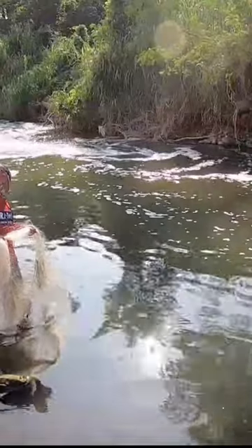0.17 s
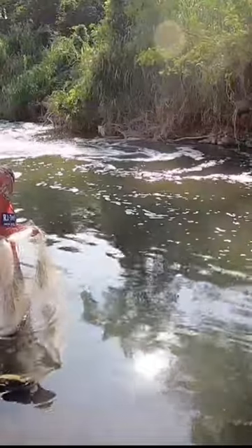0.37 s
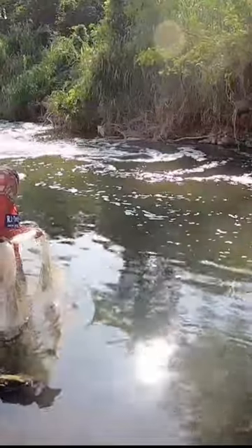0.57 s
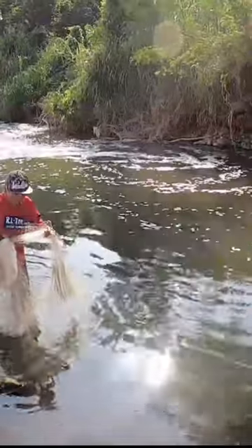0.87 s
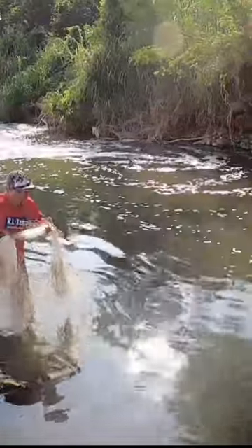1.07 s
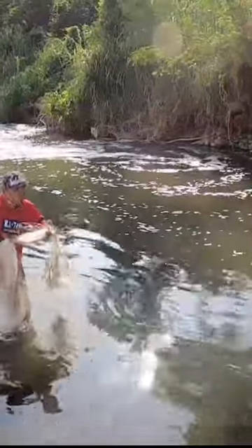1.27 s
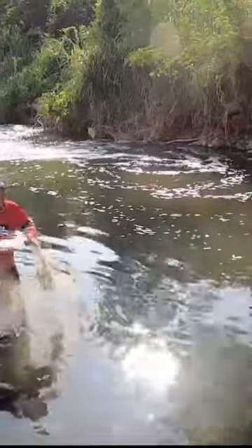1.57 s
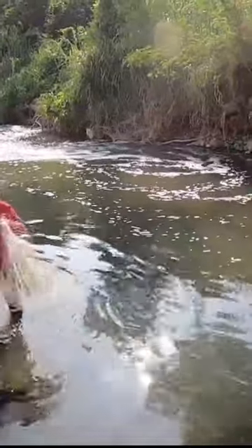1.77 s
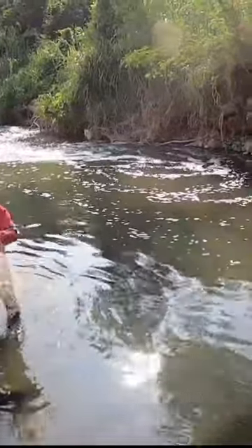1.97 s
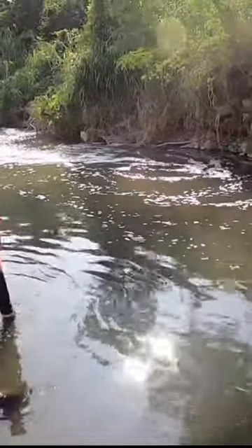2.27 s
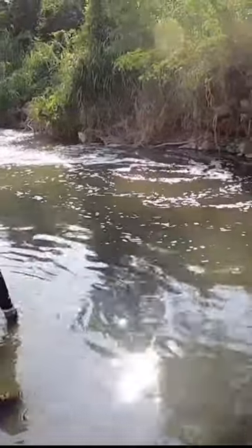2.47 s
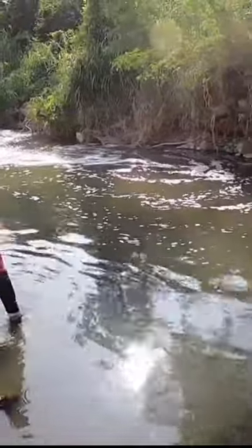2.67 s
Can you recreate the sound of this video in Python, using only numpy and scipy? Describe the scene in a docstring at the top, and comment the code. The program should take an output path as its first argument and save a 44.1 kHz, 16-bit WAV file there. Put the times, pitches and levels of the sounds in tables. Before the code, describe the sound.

A shallow river rushes steadily while a wet cast net drips and a small bird chirps

```python
"""A river riffle with an engine and a bird

A river rushes steadily over a riffle, with a low rumble underneath: shaped noise and many tiny bubble tones. A
distant engine drones and eases off: a few sine waves at multiples of its firing rate. A small bird gives short
falling chirps: brief sliding tones with a soft echo from the bank. A wading leg sloshes once, and water drips
and sloshes around a wet cast net: ringing bubbles and little splats. The sound fades in."""
import sys
import numpy as np
from scipy import signal
from scipy.fft import rfft, irfft, next_fast_len
from scipy.io import wavfile
from scipy.ndimage import map_coordinates

SR = 44100
rng = np.random.default_rng(int(sys.argv[2]) if len(sys.argv) > 2 else 0)


def wrap_up_sound(samples):
    """Save the sound to the file named by the first command line argument, as 16-bit audio."""
    columns = np.atleast_2d(samples).T
    # keep every value between -1 and 1, then stretch to whole-number steps
    tamed = np.clip(columns, -1, 1)
    steps = np.round(tamed * 32767).astype(np.int16)
    wavfile.write(sys.argv[1], SR, steps)


N = 124803  # length in samples

DECAY_60_DB = np.log(1000)  # exp(-DECAY_60_DB) is a fall of 60 dB


def amp(db):
    """Turn decibels into a gain."""
    return 10 ** (np.asarray(db) / 20)


def unit(x):
    """Scale a signal to an rms of 1."""
    return x / np.sqrt(np.mean(x ** 2) + 1e-20)


def along(points, hz):
    """Read a curve of (frequency, value) points, with frequency on a log axis."""
    point_hz, value = np.transpose(points)
    return np.interp(np.log(hz + 1), np.log(point_hz + 1), value)


def curves(rows):
    """Draw straight lines between timed rows: one value per sample for each column after the time."""
    time_s, *columns = np.transpose(rows)
    return [np.interp(np.arange(N) / SR, time_s, column) for column in columns]


def wobble(rate):
    """A smooth random curve through `rate` random points a second."""
    points = rng.standard_normal(1024)
    return map_coordinates(points, [np.arange(N) * rate / SR], mode="mirror")


def filtered(x, response):
    """Filter a sound by multiplying its spectrum by a response to frequency."""
    size = next_fast_len(N + SR // 2)  # spare room for the filter's tail
    hz = np.fft.rfftfreq(size, 1 / SR)
    return irfft(rfft(x, size) * response(hz), size)[..., :N]


def spread(pair, spectrum):
    """Colour two unrelated signals and mix them to stereo: bass central, treble wide, middle at rms 1."""
    # how alike left and right are: frequency_hz, likeness (1 = the same)
    likeness = [(30, .92), (120, 0.98), (500, 0.98), (1100, 0.94), (2000, 0.97), (2700, 0.86), (4000, 0.8),
                (6000, 0.63), (9000, 0.23), (14000, 0.48)]

    def middle_and_side(hz):
        angle = np.arccos(np.clip(along(likeness, hz), -1, .999)) / 2
        return amp(along(spectrum, hz)) * [np.cos(angle), np.sin(angle)]

    mid, side = filtered(pair, middle_and_side)
    return np.array([mid + side, mid - side]) / np.std(mid)


def add(track, s, sound):
    """Mix a sound into a track, starting at s seconds."""
    part = track[round(s * SR):][:len(sound)]
    part += sound[:len(part)]


def bubbles(per_s, cycles, count=9000, size=400):
    """A cloud of tiny fading, rising tones of random pitch and size; each drops 60 dB in `cycles` cycles."""
    rise, spread_db = 0.14, 3
    draws = rng.random((count, 3))[:int(per_s * N / SR)]
    when, pitch, strength = draws.T[:, :, None]
    hz = 500 + 12000 * pitch ** 2  # low pitches are the most common
    t = np.arange(size) / SR
    age = t * hz / cycles
    gain = amp(-spread_db * np.log(np.maximum(strength, .004))) * hz ** .75
    phase = 2 * np.pi * hz * t * (1 + rise * np.minimum(age, 1))
    tones = gain * np.exp(-DECAY_60_DB * age) * np.sin(phase)
    places = (when * N).astype(int) + np.arange(size)
    return np.bincount(places.ravel(), tones.ravel(), N)[:N]


def river():
    """Rushing noise, fine fizz and sparser, longer-ringing bubbles all swell slightly with the flow."""
    # colour of the water noise: frequency_hz, relative level_db per Hz
    water_colour = [(120, -10.5), (200, -8), (350, -10), (430, -8), (490, -6), (710, -8), (818, -14.5),
                    (929, -6.5), (1070, -4.5), (1260, -7), (1380, -13), (1540, -9), (1800, -14),
                    (2300, -15), (2650, -19.5), (2840, -16), (3020, -20), (4010, -22.5), (4700, -26),
                    (6300, -29.5), (6600, -33), (7600, -32), (8100, -35.5), (9800, -38), (11000, -43),
                    (12600, -42.5), (13200, -52), (15000, -59)]
    # slow swell of the river: time_s, swell_db
    swell_points = [(.3, 1.5), (.6, -0.77), (.92, 1.05), (1.02, 0), (1.35, -0.15), (1.6, 0), (2.05, -0.2),
                    (2.25, 0.1), (2.5, -0.5), (2.83, -0.3)]
    rush_db, fizz_db, gurgle_db = -39.5, -48.5, -51.5
    surge_db, flutter_db = 0.7, 0.5  # slow and fast random level changes

    rush = spread(rng.standard_normal((2, N)), water_colour)
    swell_db, = curves(swell_points)
    flow = amp(swell_db + surge_db * wobble(4.32) + flutter_db * wobble(28.1))
    fizz_pair = np.array([bubbles(per_s=1500, cycles=13) for _ in range(2)])
    fizz = spread(fizz_pair, water_colour)
    gurgle_pair = np.array([bubbles(per_s=380, cycles=22.6, size=1600) for _ in range(2)])
    gurgle = spread(gurgle_pair, water_colour)
    return flow * (amp(rush_db) * rush + amp(fizz_db) * fizz + amp(gurgle_db) * gurgle)


def rumble():
    """Low noise under the water, with an uneven level."""
    # colour of the rumble: frequency_hz, relative level_db per Hz
    low_colour = [(10, -25), (24, -2.5), (42, -1), (68, -2), (84, -9), (115, -10), (150, -11.5), (210, -15),
                  (260, -22.5), (400, -36), (900, -66)]
    # loudness of the rumble over time: time_s, level_db
    level_points = [(.2, -33.5), (.3, -42), (.4, -33), (.46, -40), (.62, -37.5), (.76, -33), (.84, -36),
                    (.95, -34.5), (1.04, -41), (1.12, -35), (1.28, -36.5), (1.42, -32), (1.54, -36),
                    (1.65, -32.5), (1.94, -35), (2.03, -31.5), (2.13, -36), (2.36, -37), (2.43, -33),
                    (2.55, -38), (2.65, -33.5), (2.72, -35)]
    level_db, = curves(level_points)
    return amp(level_db) * spread(rng.standard_normal((2, N)), low_colour)


def engine(jitter=0.0082, waver_db=1.84):
    """Only the lowest multiples of the firing rate carry this far; each wavers on its way."""
    # the engine over time: time_s, firing_rate_hz, level_db, brightness_db per multiple
    running = [(.17, 57.63, -38.5, 0.5), (.45, 56.64, -35, -2), (.65, 57, -37, 1), (.93, 55.15, -36, -0.5),
               (1.03, 50.1, -38.5, -1), (1.25, 49.58, -38, -1.5), (1.6, 48.68, -42, 1.5),
               (2.05, 47.84, -40.5, 2.2), (2.35, 48.84, -42.5, 2), (2.83, 48.2, -43.5, -4.5)]
    # strength of each tone: multiple of the firing rate, relative level_db
    multiples = [(1, -2.5), (2, -1), (3, -6), (4, -11.5)]

    hz, level_db, brightness_db = curves(running)
    phase = 2 * np.pi * np.cumsum(hz * (1 + jitter * wobble(14))) / SR
    drone = np.zeros(N)
    for multiple, db in multiples:
        tone_db = db + brightness_db * (multiple - 2) + waver_db * wobble(7.98)
        start_phase = 2 * np.pi * rng.random()
        drone += amp(tone_db) * np.sin(round(multiple) * phase + start_phase)
    return np.sqrt(2) * amp(level_db) * drone


def ring(hz, cycles):
    """One bubble: a fading, rising tone; the larger, lower ones last longer."""
    attack_s, rise = 0.00066, 0.065
    t = np.arange(SR // 10) / SR
    age = t * hz / cycles
    envelope = np.exp(-DECAY_60_DB * age) * (1 - np.exp(-t / attack_s))
    return envelope * np.sin(2 * np.pi * hz * t * (1 + rise * np.minimum(age, 1)))


def sloshes(count=100):
    """Water stirred by a wading leg (the first, low slosh) and at the net: each slosh frees a short burst of
    bubbles of like size."""
    # each slosh: start_s, length_s, bubble_pitch_hz, level_db
    slosh_list = [(.885, .08, 205, -38.5), (1.058, 0.021, 1750, -44.5), (1.925, 0.037, 3201, -53),
                  (2.045, 0.021, 4150, -54), (2.155, .035, 2520, -60), (2.195, 0.013, 618, -40.5),
                  (2.233, 0.0138, 520.5, -40), (2.31, 0.018, 3050, -50)]
    bubbles_per_s, cycles, pitch_spread = 700, 13, 0.17
    track = np.zeros(N)
    for s, length, hz, db in slosh_list:
        burst = np.zeros(SR // 2)
        bubble_count = max(int(bubbles_per_s * length), 1)
        for when, pitch in rng.random((count, 2))[:bubble_count]:
            bubble_hz = hz * np.exp(pitch_spread * (2 * pitch - 1))
            add(burst, when * length, ring(bubble_hz, cycles))
        # give every burst the same energy for its length
        add(track, s, amp(db) * burst * np.sqrt(length * SR) / np.linalg.norm(burst))
    return track


def bird(rough=0.21, jitter=0.046):
    """Each chirp is a brief, slightly rough tone that slides down."""
    # each chirp: start_s, length_s, start_pitch_hz, end_pitch_hz, level_db
    chirp_list = [(1.114, 0.016, 3030, 2360, -38.5), (1.387, .016, 2510, 1940, -40),
                  (1.433, 0.019, 2160, 2060, -43), (1.63, 0.022, 3174, 2220, -39),
                  (1.664, 0.023, 2918, 2310, -42), (1.699, 0.021, 2620, 2430, -40),
                  (1.715, 0.028, 2580, 2170, -41), (1.981, .016, 2510, 2300, -44),
                  (2.001, 0.026, 2240, 1960, -42), (2.225, 0.0167, 2760, 1900, -42.5)]
    track = np.zeros(N)
    for s, length, start_hz, end_hz, db in chirp_list:
        progress = np.linspace(0, 1, int(length * SR))
        slide_hz = start_hz * (end_hz / start_hz) ** progress
        hz = slide_hz * (1 + jitter * wobble(560)[:len(progress)])
        envelope = np.sqrt(abs(np.sin(np.pi * progress)))
        add(track, s, amp(db) * envelope * np.sin(2 * np.pi * np.cumsum(hz) / SR))
    return track * (1 + rough * wobble(250))


def bank(x):
    """The overgrown bank scatters a short, soft tail to each side: fading noise that first builds up."""
    t60_s, build_up_s, echo_db = 0.17, 0.0098, -8
    t = np.arange(SR // 3) / SR
    envelope = np.exp(-DECAY_60_DB * t / t60_s) * np.minimum(t / build_up_s, 1)
    tail = rng.standard_normal((2, len(t))) * envelope
    echo = signal.fftconvolve(x[None], tail / np.linalg.norm(tail[0]), axes=1)[:, :N]
    return x + amp(echo_db) * echo


def drops(splat_db=-8, splat_t60_s=.004):
    """Each drop hits with a brief splat of noise and rings one small bubble."""
    # each drop: start_s, pitch_hz, level_db
    drop_list = [(1.85, 5200, -39.5), (2.152, 1900, -42), (2.178, 1363, -33), (2.262, 2800, -36),
                 (2.359, 3170, -32.5), (2.373, 3950, -31)]
    track, t = np.zeros(N), np.arange(SR // 10) / SR
    for s, hz, db in drop_list:
        # the splat is noise one octave wide around the bubble's pitch
        band = signal.butter(2, [hz / np.sqrt(2), hz * np.sqrt(2)], "band", fs=SR, output="sos")
        noise = unit(signal.sosfilt(band, rng.standard_normal(len(t))))
        splat = noise * np.exp(-DECAY_60_DB * t / splat_t60_s)
        add(track, s, amp(db) * (ring(hz, cycles=32) + amp(splat_db) * splat))
    return track


def scene():
    """River, rumble and engine lean left, but right in the high treble; the other sounds are central."""
    # level difference between the sides: frequency_hz, left_minus_right_db
    side_levels = [(60, 1), (99, 0.5), (160, 0.5), (270, 1.5), (440, 0.5), (730, 3), (1210, 1.5), (1990, 4),
                   (3280, 3.5), (5400, 2.5), (8900, -3.5), (14700, 0)]
    # timing difference between the sides: frequency_hz, right_lead_radians
    side_phases = [(100, 0.11), (780, 0.22), (1550, 0.28), (2330, 1), (2900, 0.58), (4700, 0.0099),
                   (6400, 0.79), (8000, 0.56), (11000, 0.087)]

    def lean(hz):
        gain = amp(along(side_levels, hz) / 2 * [[1], [-1]])
        return gain * np.exp(1j * along(side_phases, hz) / 2 * [[-1], [1]])

    leaning = filtered(river() + rumble() + engine(), lean)
    return leaning + sloshes() + bank(bird()) + drops()


def record(dry):
    """Fade the sound in, end it without a click and keep nothing above the band limit."""
    # fade-in: time_s, gain_db
    fade_points = [(0, -87.5), (.08, -69.5), (.095, -47.5), (.15, -36), (.159, -15), (.175, -5), (.245, -3),
                   (.275, 0)]
    top_hz = 15150
    fade_db, = curves(fade_points)
    stop = np.minimum(np.arange(N)[::-1] / 64, 1)  # fade out over the last 64 samples
    return filtered(dry * amp(fade_db) * stop, lambda hz: hz < top_hz)


dry = scene()
out = record(dry)
wrap_up_sound(out)
```